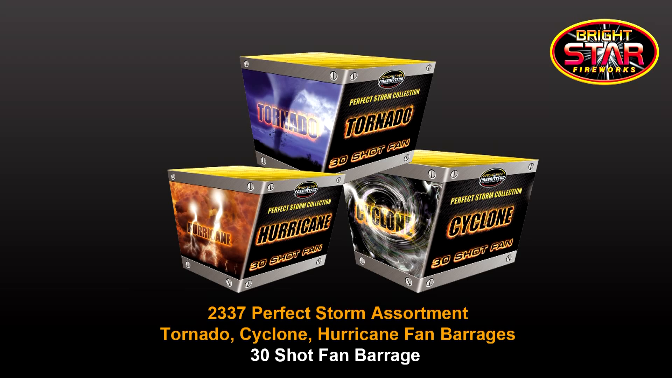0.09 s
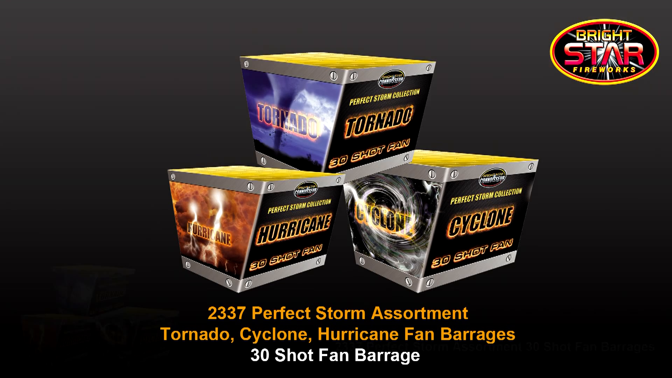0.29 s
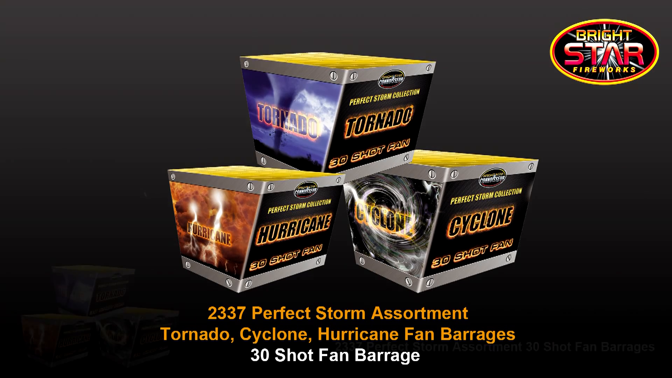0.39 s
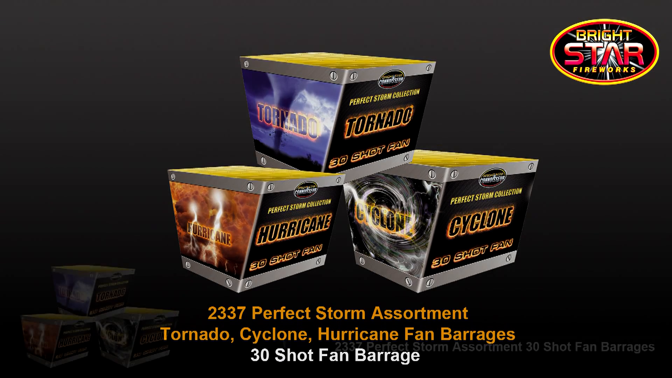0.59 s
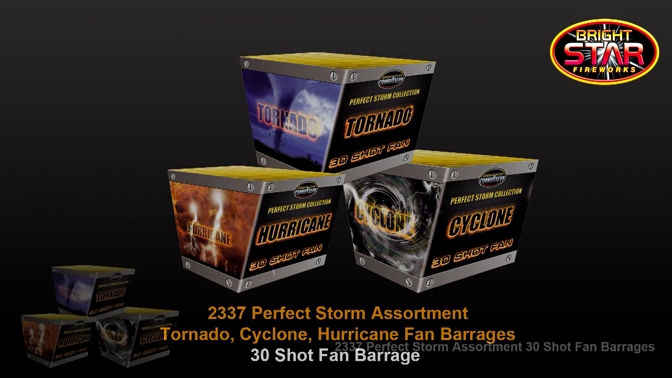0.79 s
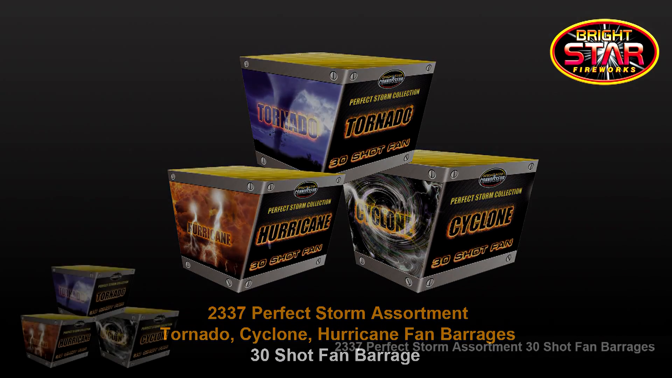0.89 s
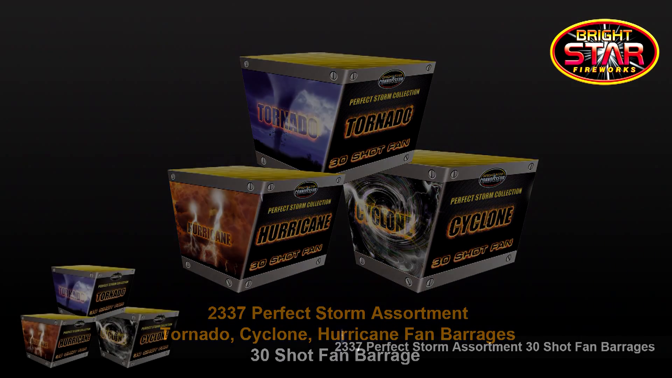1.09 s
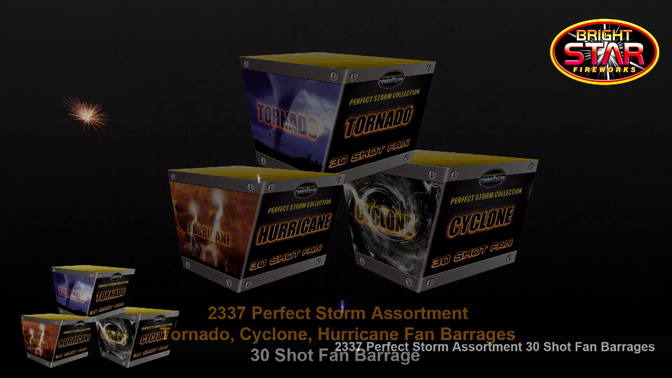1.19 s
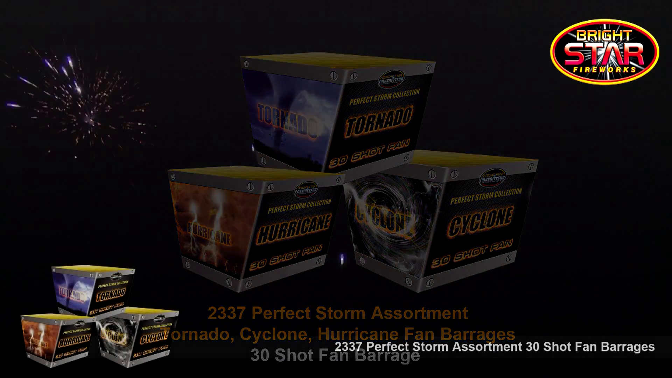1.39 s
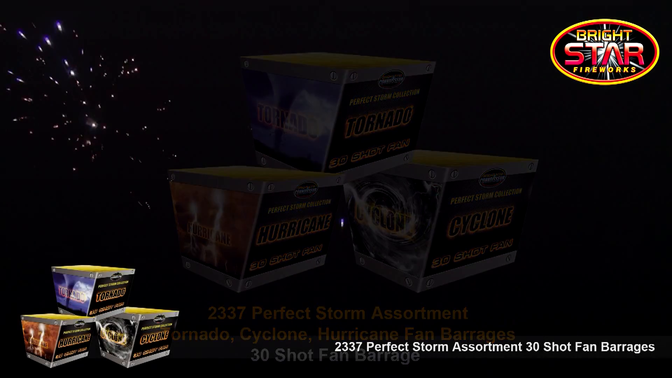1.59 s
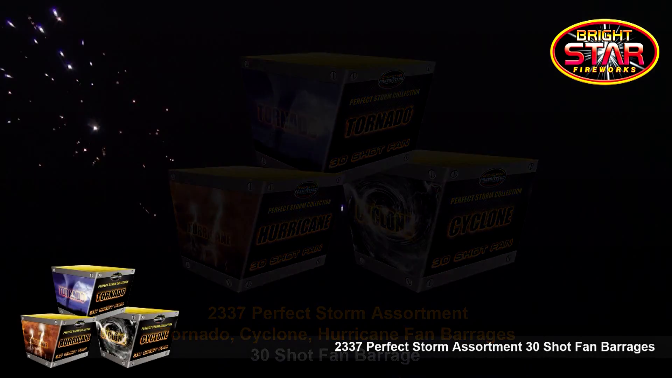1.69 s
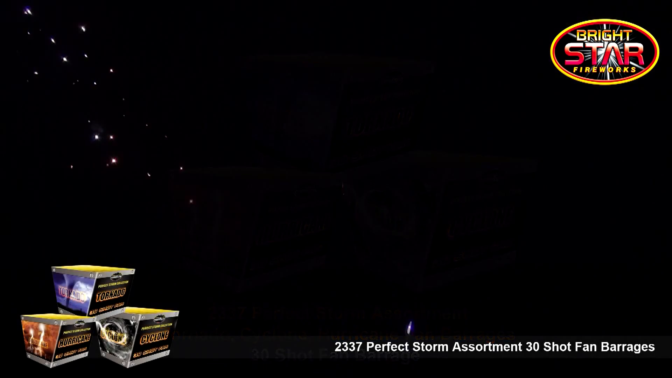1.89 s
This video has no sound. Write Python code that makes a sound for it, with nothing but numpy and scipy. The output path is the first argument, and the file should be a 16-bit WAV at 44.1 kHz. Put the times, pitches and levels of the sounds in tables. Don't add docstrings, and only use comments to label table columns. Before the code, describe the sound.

Firework cake in a walled yard at night: two quick cracking shots, a short gap, then a third with heavy overhead bursts; echoes rumble and hiss away, a faint cricket chirps; stereo microphone nearby, brighter on the right.

```python
import sys
import numpy as np
from scipy import signal
from scipy.fft import rfft, irfft
from scipy.io import wavfile
from scipy.ndimage import uniform_filter1d

SR = 44100
rng = np.random.default_rng(int(sys.argv[2]) if len(sys.argv) > 2 else 0)


def pcm_store(signal):
    levels = np.round(np.clip(np.atleast_2d(signal), -1, 1) * 32767)
    wavfile.write(sys.argv[1], SR, levels.astype(np.int16).T)


def linear_from_db(decibels):
    return 10 ** (np.asarray(decibels, float) / 20)


N = 85995

LIFT_S = [
    .2187,
    .6436,
    1.3572,
]
# [blast level/dB, rumble level/dB, hiss level/dB, flash level/dB]
LIFT_LEVELS = [
    (1.5, 4, 1.5, -32),
    (-2, 0.5, -2.5, -30.5),
    (-1.5, 4, 5.5, -27),
]
WALL_DELAYS = [0, .0046, .0149, .0186, .0223, .0334, .042, .0475, .0535, .0625, .0665, .075, .13, .1345,
               .172, .1775, .1855, .189, .2494]
# [thump level/dB, crack level/dB, thump f/Hz, top f/Hz]
WALL_ECHOES = [(-4.5, -2, 224, 17000), (-12, -31, 191, 2000), (-22, -13.5, 230, 8400),
               (-16.5, -9.5, 420, 10300), (-32, -10, 370, 6000), (-2, -9.5, 286, 3100),
               (-10, -35, 290, 3000), (-8, -25, 400, 3000), (-11, -35, 480, 3000), (-13, -21, 350, 3000),
               (-19.5, -25, 360, 3800), (-17, -18.5, 280, 9400), (-21, -40, 214, 900),
               (-18.5, -40, 200, 1000), (-21, -25, 260, 2100), (-19.5, -33, 240, 2000),
               (-31, -21, 250, 2500), (-14, -10.5, 224, 2900), (-46, -32, 305, 2000)]
# [t/s, thump level/dB, crack level/dB, thump f/Hz, top f/Hz]
SHELL_BURSTS = [(0.2133, -6, -13, 408, 9100), (0.5181, -5.5, -8, 300, 1910),
                (0.5414, -12.5, -30, 257, 1210), (0.555, -25, -31, 332, 1190),
                (0.559, -15.5, -36, 360, 1140), (1.352, -26, -13, 396, 12300),
                (1.3964, -9, -13, 310, 11900), (1.398, -12, -12, 200, 4500), (1.4015, -10, -25, 330, 3000),
                (1.4044, -9, -37, 264, 2930), (1.4186, -5, -23, 385, 9150), (1.44, -9, -24, 347, 3050),
                (1.474, -15, -13, 343, 1990), (1.498, -20, -19, 315, 2000), (1.511, -9.5, -28, 260, 2010),
                (1.538, -15.5, -30, 305, 2040), (1.599, -11.5, -14.5, 252, 2000),
                (1.63, -15.5, -31, 280, 2000)]
# [t/s, thump level/dB, crack level/dB, thump f/Hz, top f/Hz]
LEFT_POPS = [
    (.2152, -17, -9, 300, 6500),
    (.6375, -18.5, -24, 322, 4860),
    (1.3519, -25, -24, 300, 5010),
    (1.3866, -15, -26, 640, 4000),
    (1.3907, -6, -22, 400, 3500),
]
# [f/Hz, level/dB, t60/s]
CRACK_MODES = [(1177, -3, 0.0084), (2052, 0.5, 0.0042), (4470, -2.5, 0.0014)]

RUMBLE_SPECTRUM = [(18, -60), (40, -29), (190, -5), (365, -6.5), (520, -14.5), (1100, -14.5), (2500, -23.5),
                   (16000, -39.5)]
HISS_SPECTRUM = [(900, -31), (1500, -8.5), (2100, -3), (3500, -5), (4900, -7.5), (6500, -8), (12700, -22.5),
                 (16000, -38)]
SHEEN_SPECTRUM = [(5000, -30), (8500, -6.5), (11000, 0.5), (14000, -8.5), (16000, -19)]
HEDGE_SPECTRUM = [(4500, -27), (5800, -3.5), (7000, 1), (8200, -8), (10500, -30), (16000, -60)]
ROLL_SPECTRUM = [(18, -62), (40, -28), (150, -11), (300, -5.5), (550, -7.5), (1000, -24.5), (2500, -34.5),
                 (16000, -85)]
# [t/s, level/dB]
RUMBLE_DECAY = [(0, -28), (.03, -24.5), (.045, -25.5), (.08, -28), (.12, -31), (.2, -29), (.3, -34.5),
                (.4, -46), (.7, -52)]
HISS_DECAY = [(0, -42), (.03, -39.5), (.1, -37.5), (.19, -35.5), (.26, -37), (.33, -44), (.45, -49.5),
              (0.701, -53)]
SHEEN_DECAY = [(0, -62), (.03, -52), (.06, -40.5), (.09, -50), (0.149, -45), (.3, -72)]
HEDGE_DECAY = [(0, -80), (.11, -58), (.135, -42.5), (.22, -46), (.31, -46.5), (.335, -66), (.5, -88)]
ROLL_DECAY = [(0, -33), (0.024, -15.5), (0.08, -18), (.15, -28), (.25, -29), (.35, -31.5), (.42, -38.5),
              (0.549, -38.5)]

# [f/Hz, level/dB]
NIGHT_SPECTRUM = [(15, -65), (25, -29.5), (279, -11.5), (761, -18), (921, -16.5), (1310, -18.5),
                  (1420, -17.5), (8980, -42), (16300, -42)]
ECHO_SHADOW = [(60, -4.5), (200, -1.5), (500, -8.5), (1300, -24), (2300, -10), (4000, -25), (6000, -1.5),
               (10500, -6.5)]
BLAST_SHADOW = [(60, 5), (200, -4.5), (500, -9), (1200, -18), (3000, -18), (6500, -7), (11000, -34),
                (16000, -18)]
SHEEN_PAN = [(5000, 16), (11000, -3.5), (16000, -30)]
HEDGE_PAN = [(4500, -6), (7000, -2), (10500, -6)]
NIGHT_PAN = [(60, -3), (180, 2), (550, -8), (1650, -12.5), (4970, -8), (15000, -3)]
# [f/Hz, share 0..1]
LIKENESS = [(60, 1), (180, 0.91), (550, 0.99), (1650, 0.93), (4970, 0.34), (15000, 0.27)]

# [t/s, level/dB, lowest f/Hz, highest f/Hz, length t/s]
TICKS = [
    (.1245, -47, 4300, 8200, .003),
    (1.1622, -40, 2500, 7500, .001),
    (1.5793, -29, 7000, 15800, .0035),
    (1.5848, -37, 6000, 13000, .002),
]
# [middle of last syllable t/s, level/dB, share of pitch fall]
CHIRPS = [
    (.1255, -40, .45),
    (.6270, -44, 1),
    (1.2325, -42.5, 1),
]
# [above f/Hz, threshold level/dB, rise/dB per dB of loudness]
TREBLE_GATES = [
    (11500, -75, 1.0),
    (15000, -76, .25),
]

LUMPY_DB, GRAINY_DB = 2, 1.2


def evened(x):
    return x / np.sqrt(np.mean(x ** 2) + 1e-20)


def read(points, hz):
    f, value = np.transpose(points)
    return np.interp(np.log(hz + 1), np.log(f + 1), value)


def colour(x, points):
    size = x.shape[-1]
    gain = linear_from_db(read(points, np.fft.rfftfreq(size, 1 / SR)))
    return irfft(rfft(x) * gain, size)


def add(mix, s, sound):
    part = mix[..., max(round(s * SR), 0):][..., :sound.shape[-1]]
    part += sound[..., :part.shape[-1]]


def smooth(x, size, axis=-1):
    return uniform_filter1d(x, size=size, axis=axis)


def ring(hz, db, t60, t):
    return linear_from_db(db - 60 * t / t60) * np.sin(2 * np.pi * hz * t) * (t >= 0)


def blast(thump_db, crack_db, hz, top_hz, turns=3.53):
    dip_s, snap_s = 0.00048, 0.00008
    t = np.arange(2600) / SR
    late = np.maximum(t - dip_s, 0)
    thump = linear_from_db(-60 * (late * hz / turns) ** 2) * np.sin(2 * np.pi * hz * late)
    thump += ring(572, -5.5, 0.014, late)
    crack = -sum(ring(f * rng.uniform(0.91, 1.15), db, t60, t) for f, db, t60 in CRACK_MODES)
    crack += linear_from_db(-11 - 60 * t / 0.008) * rng.standard_normal(len(t))
    crack -= linear_from_db(2.5) * (1 - t / snap_s) * np.exp(-t / snap_s)
    air = signal.butter(3, min(top_hz, 20000), fs=SR)
    return signal.lfilter(*air, linear_from_db(thump_db) * thump + linear_from_db(crack_db) * crack)


def push():
    push_s, push_db = 0.0015, -16
    u = np.arange(4000) / SR / push_s
    return linear_from_db(push_db) * u * (2 - u) * np.exp(-u) * 2


def blasts():
    burst_turns, pop_turns, pop_right_db, low_cut_hz = 2.45, 2.3, -24, 140
    main, pops, low = np.zeros((3, N))
    for s, (db, *_) in zip(LIFT_S, LIFT_LEVELS):
        add(low, s, linear_from_db(db) * push())
        for delay, row in zip(WALL_DELAYS, WALL_ECHOES):
            add(main, s + delay, linear_from_db(db) * blast(*row))
    for s, *row in SHELL_BURSTS:
        add(main, s, blast(*row, burst_turns))
    for s, *row in LEFT_POPS:
        add(pops, s, blast(*row, pop_turns))
    add(low, 1.397, push())
    left = colour(main, BLAST_SHADOW) + pops
    right = main + linear_from_db(pop_right_db) * pops
    low_cut = signal.butter(2, low_cut_hz, "high", fs=SR)
    return signal.lfilter(*low_cut, np.array([left, right])) + low


def flashes():
    flash_s, lo_hz, hi_hz = 0.017, 480, 4520
    out, t = np.zeros((2, N)), np.arange(0, flash_s, 1 / SR)
    band = signal.butter(8, [lo_hz, hi_hz], "band", fs=SR, output="sos")
    for s, (*_, db) in zip(LIFT_S, LIFT_LEVELS):
        spit = evened(signal.sosfilt(band, rng.standard_normal((2, 2000))))
        spit = (spit + 0.8 * spit[::-1])[:, -len(t):]
        swell = np.minimum(t / 0.001, 1) * linear_from_db(db - 5.9 * (1.5 - t / flash_s))
        add(out, s - flash_s, swell * spit)
    return out


def pair(spectrum, pan, lumpy_db, size):
    a, b, c = rng.standard_normal((3, size))
    same = np.clip(read(LIKENESS, np.fft.rfftfreq(size, 1 / SR)), 0, 1)
    left = irfft(same * rfft(a) + np.sqrt(1 - same ** 2) * rfft(b), size)
    lumps = linear_from_db(lumpy_db * evened(smooth(smooth(c, 150), 150)))
    both = colour(np.array([colour(left, pan), a]) * lumps, spectrum)
    return both / np.sqrt(np.mean(both[1] ** 2))


def faded(noise, curve):
    s, db = np.transpose(curve)
    return noise * linear_from_db(np.interp(np.arange(noise.shape[-1]) / SR, s, db))


def patchy(x):
    z = signal.stft(x, nperseg=512)[2]
    field = rng.standard_normal(z.shape[1:])
    field = evened(smooth(smooth(field, 9, axis=0), 10, axis=1))
    return signal.istft(z * linear_from_db(1.6 * field), nperseg=512)[1][:, :x.shape[1]]


def scatter(spectrum, pan, decay, size=30000):
    return faded(patchy(pair(spectrum, pan, GRAINY_DB, size)), decay)


def rumbles():
    out = np.zeros((2, N))
    rumble = faded(pair(RUMBLE_SPECTRUM, ECHO_SHADOW, LUMPY_DB, 30000), RUMBLE_DECAY)
    for s, (_, rumble_db, _, _) in zip(LIFT_S, LIFT_LEVELS):
        add(out, s, linear_from_db(rumble_db) * rumble)
    return out


def rolls():
    out = np.zeros((2, N))
    for s, db in [(1.397, 0), (0.519, -16)]:
        roll = faded(pair(ROLL_SPECTRUM, ECHO_SHADOW, LUMPY_DB, 30000), ROLL_DECAY)
        add(out, s, linear_from_db(db) * roll)
    return out


def hisses():
    out = np.zeros((2, N))
    for s, (_, _, hiss_db, _) in zip(LIFT_S, LIFT_LEVELS):
        add(out, s, linear_from_db(hiss_db) * scatter(HISS_SPECTRUM, ECHO_SHADOW, HISS_DECAY))
        add(out, s, linear_from_db(hiss_db) * scatter(SHEEN_SPECTRUM, SHEEN_PAN, SHEEN_DECAY))
        add(out, s, linear_from_db(hiss_db) * scatter(HEDGE_SPECTRUM, HEDGE_PAN, HEDGE_DECAY, 24000))
    return out


def ticks():
    out = np.zeros((2, N))
    for s, db, lo_hz, hi_hz, length in TICKS:
        u = np.arange(400) / SR / length
        burst = rng.standard_normal(400) * np.sin(np.pi * np.minimum(u, 1) ** 0.64)
        snap = signal.lfilter(*signal.butter(3, [lo_hz, hi_hz], "band", fs=SR), burst)
        add(out, s, linear_from_db(db) * np.array([[0.6], [1]]) * snap)
    return out


def cricket():
    wing_hz, rise_hz, glide_hz, pan_db = 6480, 35.3, 820, 2.2
    gap_s, gap_shrink_s, syllable_s, syllable_shrink_s = 0.0074, 0.00016, 0.006, 0.00025
    out = np.zeros(N)
    for end, db, fall in CHIRPS:
        for k in range(14):
            length = syllable_s - syllable_shrink_s * k
            u = np.arange(0, length, 1 / SR) / length
            glide = glide_hz * (0.5 - u) * min(k + 1, 6) / 6
            hz = wing_hz + fall * (rise_hz * k + glide)
            hz *= 1 + 0.012 * rng.standard_normal()
            rasp = 1 + 0.18 * evened(smooth(rng.standard_normal(400), 30))[:len(u)]
            wave = rasp * np.sin(2 * np.pi * np.cumsum(hz) / SR) * np.sin(np.pi * u)
            start = end - k * gap_s + gap_shrink_s * k * k / 2 - length / 2
            level_db = db - 0.075 * k * k + rng.standard_normal()
            add(out, start, linear_from_db(level_db) * wave)
    return out * linear_from_db(np.array([[pan_db], [-pan_db]]))


def night():
    return linear_from_db(-44) * pair(NIGHT_SPECTRUM, NIGHT_PAN, 1.94, N + 1)[:, :N]


def scene():
    fireworks = blasts() + flashes()
    echoes = rumbles() + rolls() + hisses()
    return fireworks + echoes + ticks() + cricket() + night()


def gate(x):
    mask_from_db = -27
    hz, _, z = signal.stft(x, SR, nperseg=1024)
    power = abs(z) ** 2
    power_db = 10 * np.log10(smooth(power, 16, axis=1) + 1e-20)
    loud_db = 10 * np.log10(power.sum(axis=1, keepdims=True) + 1e-20)
    edge_hz, under_db, rise = np.transpose(TREBLE_GATES)[:, :, None, None]
    bar_db = under_db + rise * np.maximum(loud_db - mask_from_db, 0)
    keep = (power_db > bar_db) | (hz[:, None] < edge_hz)
    return signal.istft(z * keep, SR, nperseg=1024)[1][:, :N]


def whine():
    level_db = -76 + 4.0 * evened(smooth(rng.standard_normal(N), 900))
    return linear_from_db(level_db) * np.sin(2 * np.pi * 15700 * np.arange(N) / SR)


def top_cut(x):
    return signal.sosfilt(signal.butter(12, 16520, fs=SR, output="sos"), x)


def record(dry):
    open_s, open_rise_s, edge_hz = 0.067, 0.0056, 15950
    x = gate(np.tanh(dry))
    x[1] += whine()
    band_limit = signal.firwin(511, edge_hz, window=("kaiser", 9), fs=SR)
    x = signal.oaconvolve(x, band_limit[None], "same")
    opening = np.clip((np.arange(N) / SR - open_s) / open_rise_s, 0, 1)
    return top_cut(x * opening)


dry = scene()
out = record(dry)
pcm_store(out)
```